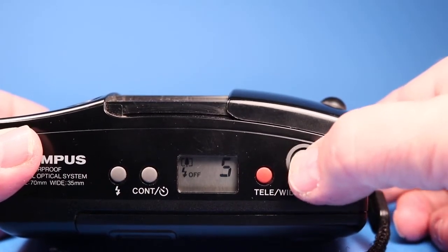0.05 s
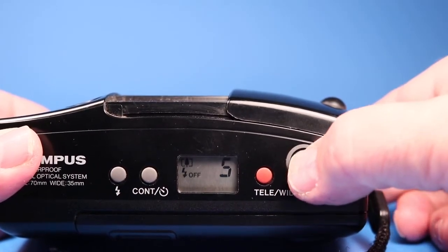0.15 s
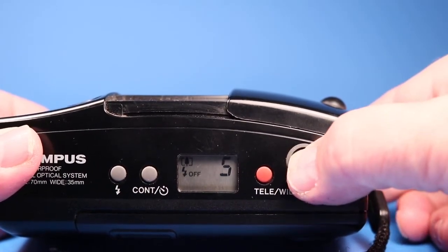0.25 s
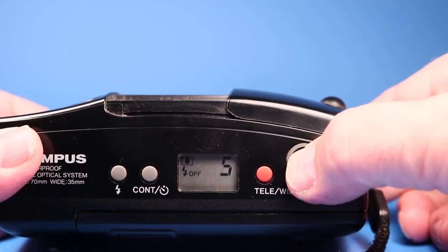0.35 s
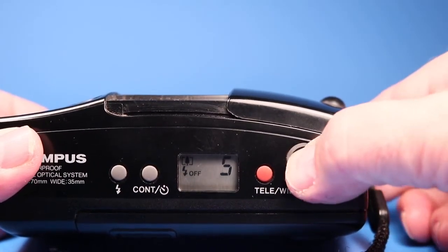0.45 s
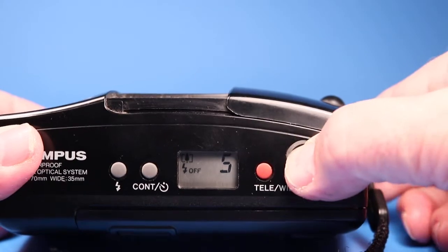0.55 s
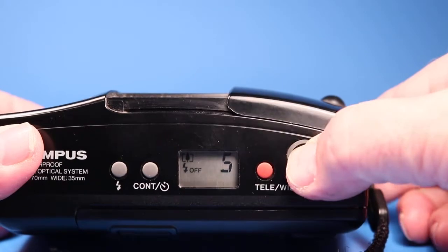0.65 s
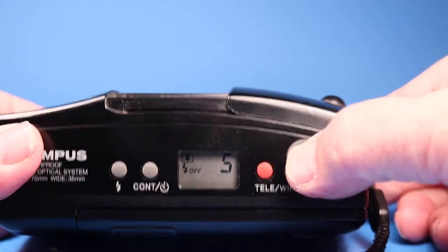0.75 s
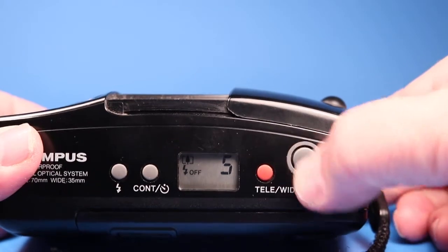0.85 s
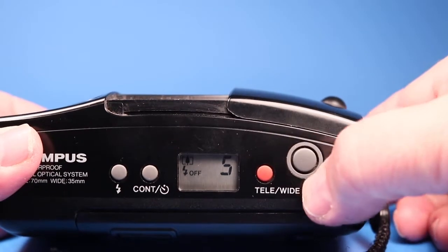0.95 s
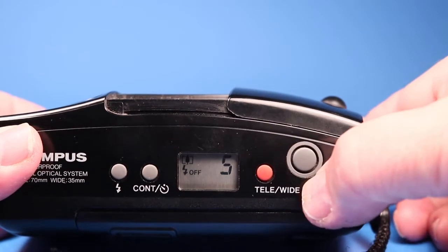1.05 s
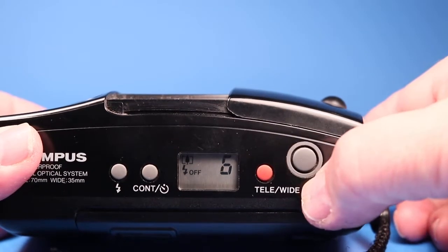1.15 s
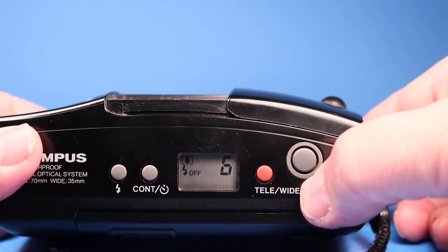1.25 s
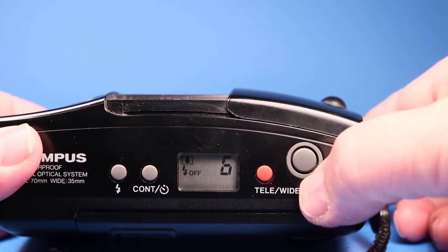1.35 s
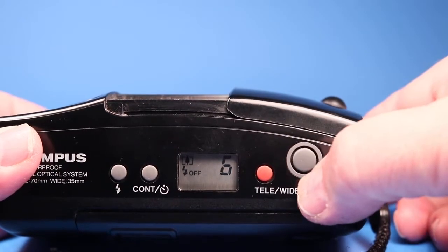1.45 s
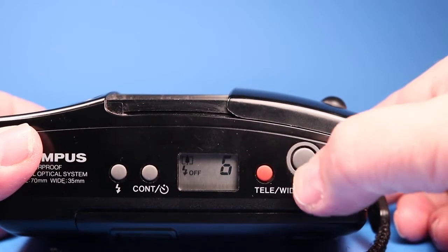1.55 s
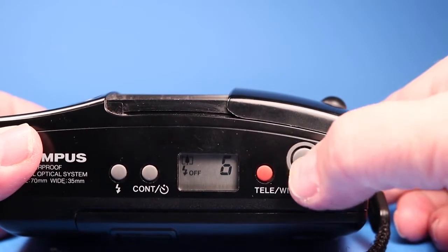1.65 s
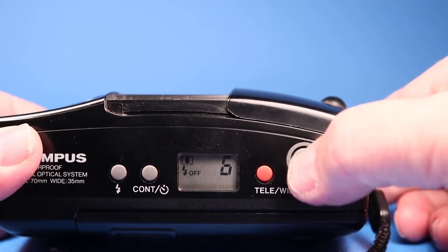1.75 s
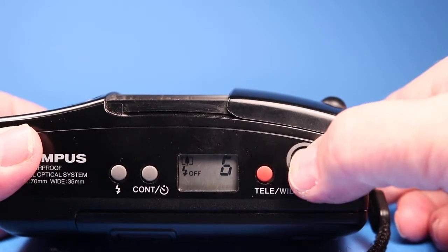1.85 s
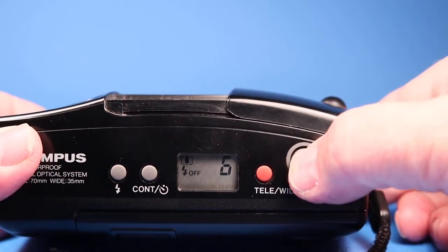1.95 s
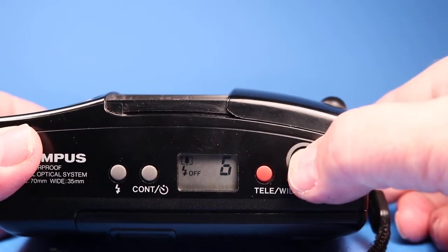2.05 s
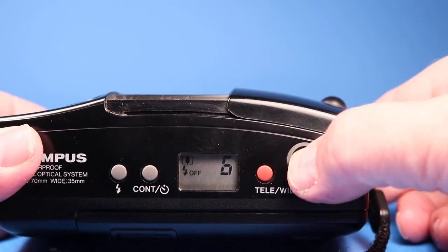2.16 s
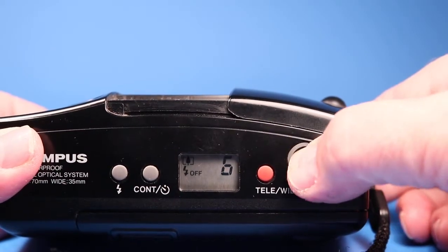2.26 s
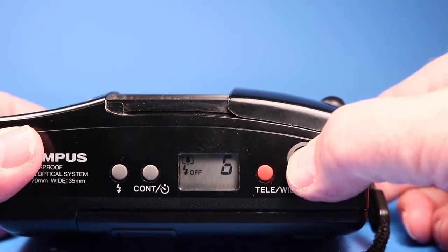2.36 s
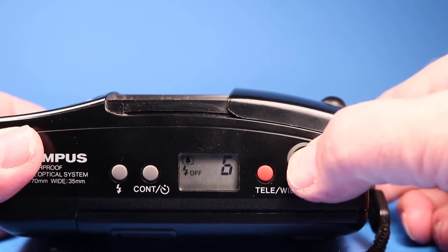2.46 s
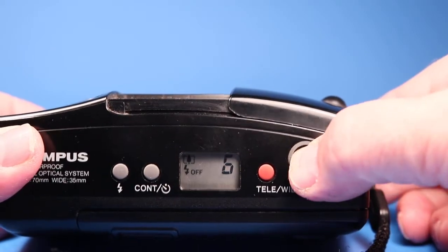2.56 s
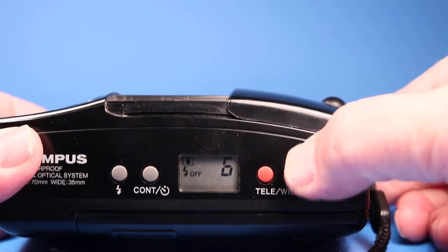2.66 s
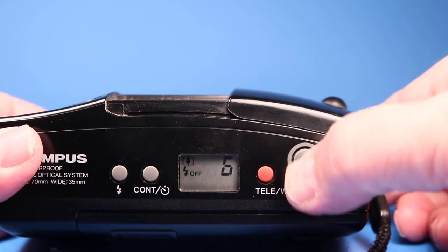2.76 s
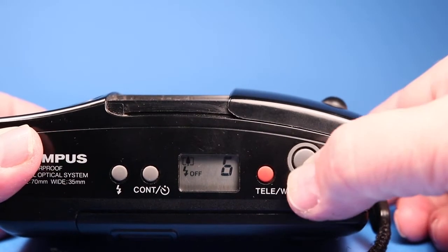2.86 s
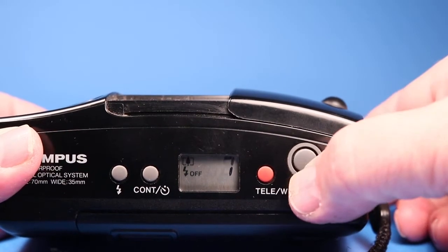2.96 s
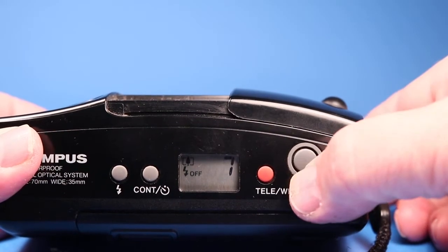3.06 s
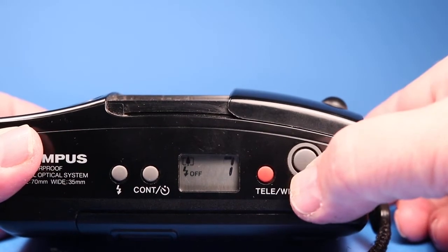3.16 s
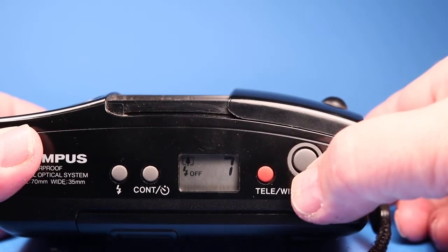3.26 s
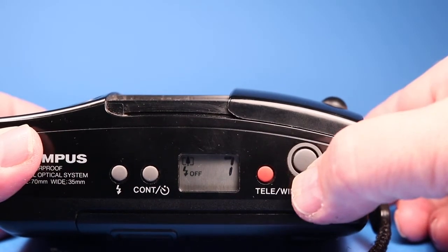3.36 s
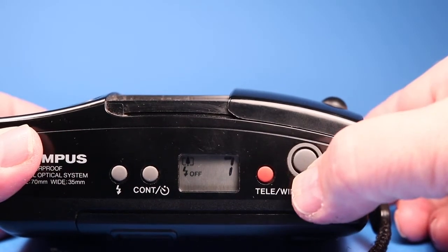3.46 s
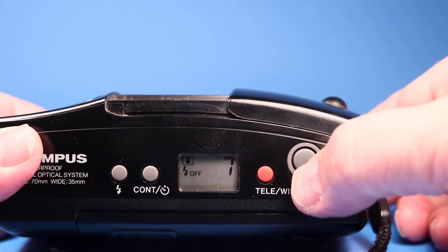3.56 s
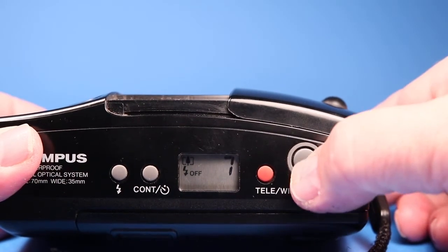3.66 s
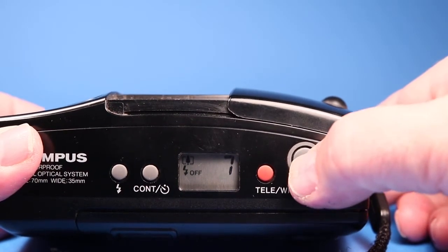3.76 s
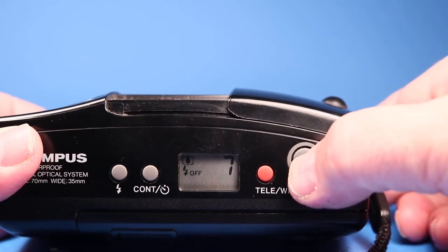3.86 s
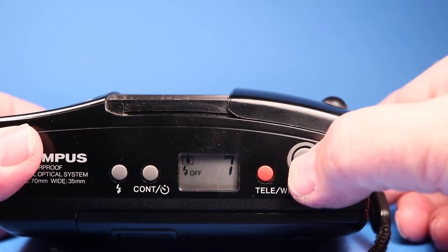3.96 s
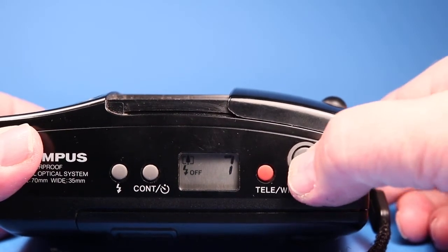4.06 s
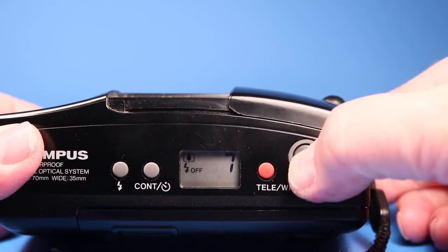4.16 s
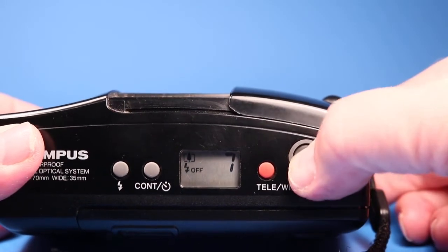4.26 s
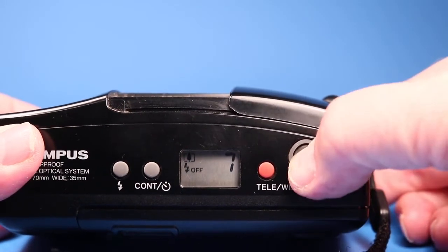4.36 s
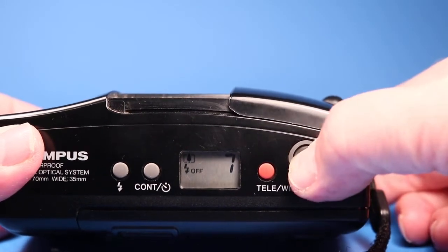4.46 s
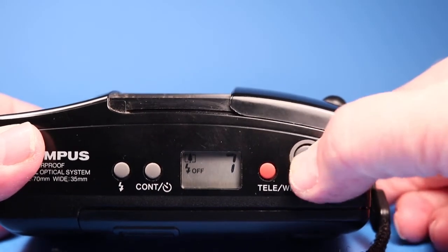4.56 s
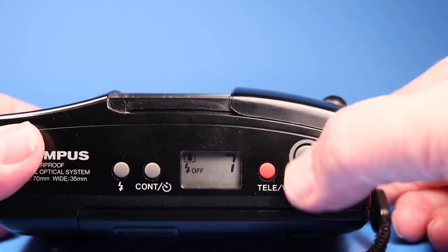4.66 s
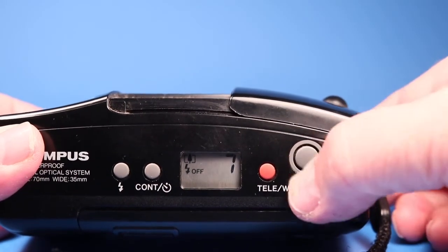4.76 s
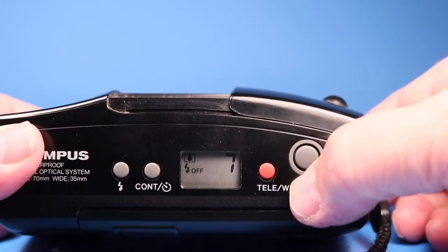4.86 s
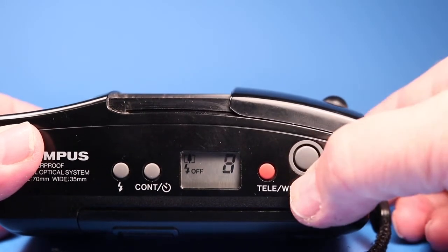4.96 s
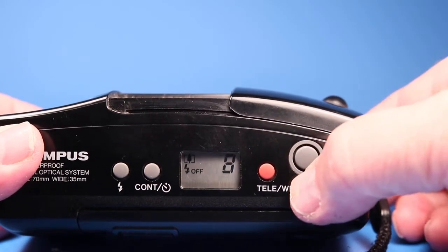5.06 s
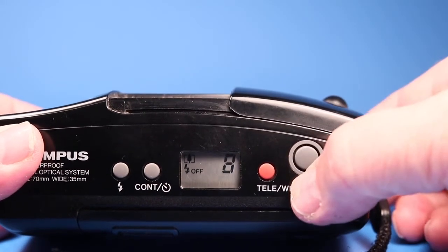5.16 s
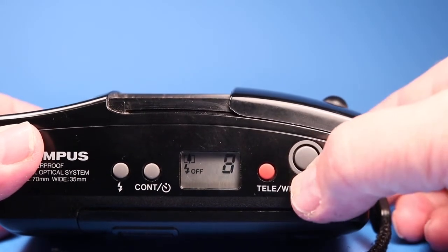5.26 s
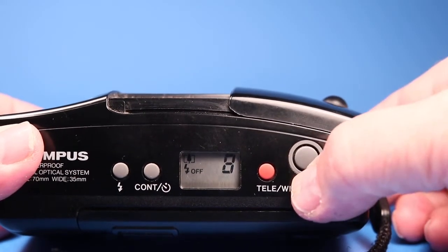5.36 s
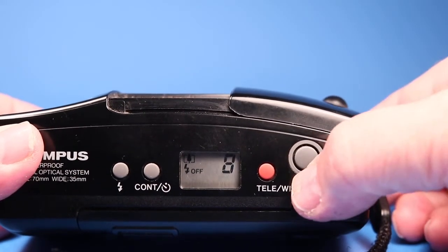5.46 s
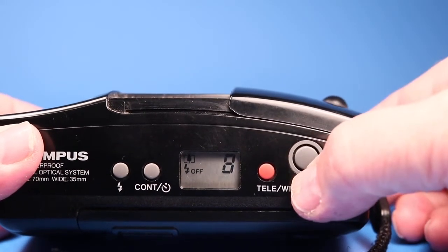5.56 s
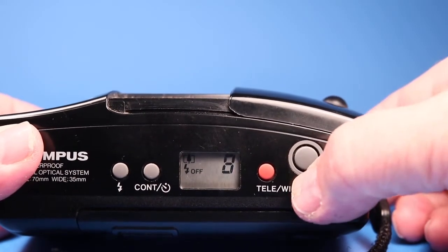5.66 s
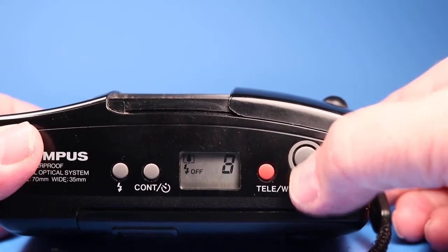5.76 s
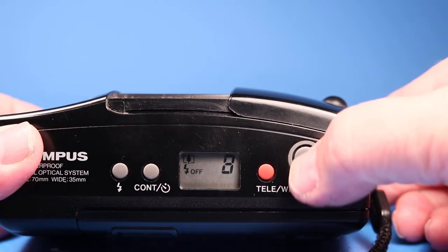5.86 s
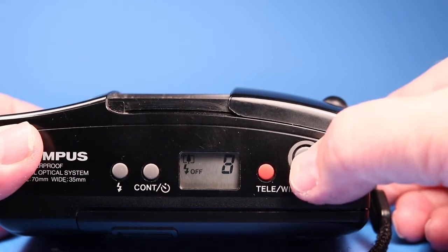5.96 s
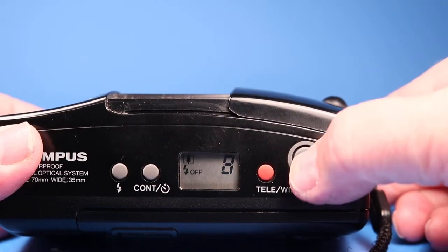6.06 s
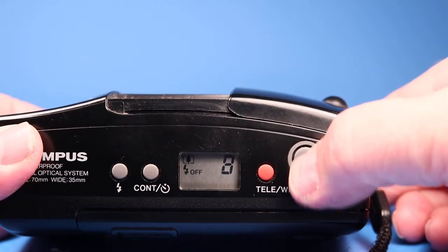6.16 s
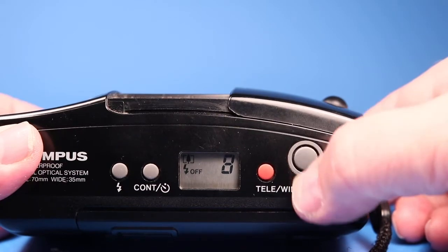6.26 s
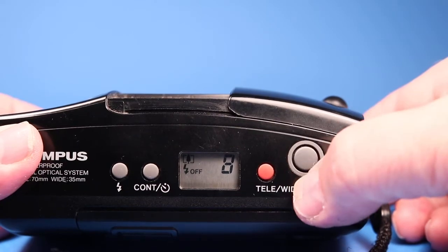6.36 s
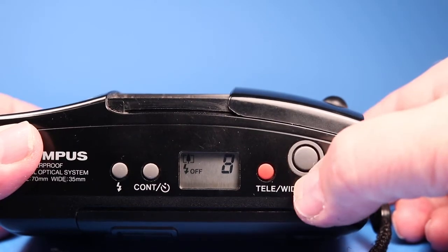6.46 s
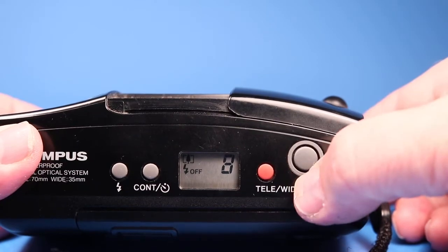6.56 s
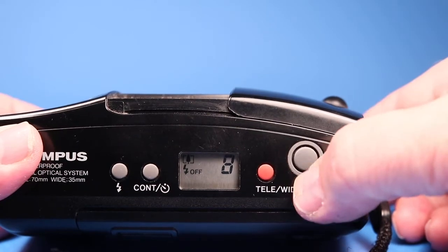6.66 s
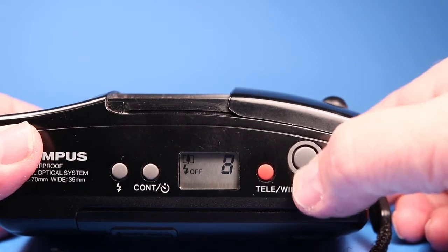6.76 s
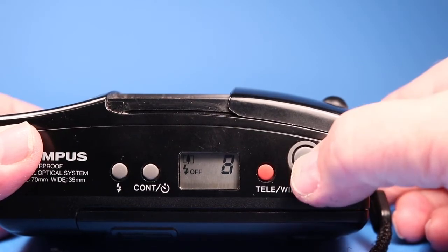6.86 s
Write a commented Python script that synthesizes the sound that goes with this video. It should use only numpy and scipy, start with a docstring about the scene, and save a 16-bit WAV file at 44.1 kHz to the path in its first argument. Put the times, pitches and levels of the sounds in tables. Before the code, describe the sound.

Three times in a quiet room, a small film camera's motor grinds and ticks, the shutter snaps, and the film whirrs forward.

```python
"""A quiet room: a compact film camera, held close, takes three pictures.
Each time the motor labours through a cam cycle with ticking pawls and two juddering climbs; the
mechanism snaps over; the motor runs up, winds the film past a counter click and coasts to rest.
Gear noise, mesh tones and impacts sound through the plastic body. Under them: brush hiss,
a ringing spring, thumb touches, room air and mains hum."""
import sys
import numpy as np
from scipy import signal
from scipy.fft import rfft, irfft, next_fast_len
from scipy.io import wavfile

SR = 44100
rng = np.random.default_rng(int(sys.argv[2]) if len(sys.argv) > 2 else 0)


def put_to_file(sound):
    """Save the sound as 16-bit audio at rate SR, in the file named by the first command-line argument."""
    columns = np.atleast_2d(sound).T  # one column per channel
    safe = np.clip(columns, -1, 1)
    whole_steps = np.round(safe * 32767)
    wavfile.write(sys.argv[1], SR, whole_steps.astype(np.int16))


N = 304157
TIME_S = np.arange(N) / SR
FFT_SIZE = 2 * next_fast_len(N // 2 + SR // 4)
BIN_HZ = np.maximum(np.arange(FFT_SIZE // 2 + 1) * SR / FFT_SIZE, 1)

# cam cycle per picture: start_s, time_stretch, snap_s, snap_db
CAM_CYCLES = [(.5587, 1, 1.159, -9), (2.373, 1, 2.978, -6.5), (4.3597, 1.014, 4.9679, -7)]
# wind per picture: click_s, power_cut_s, full_speed_hz, drag_loss_hz, spring_offset_db
FILM_WINDS = [(1.368, 1.579, 311, -0.5, 1), (3.184, 3.437, 311, 0.5, 3), (5.1707, 5.4288, 311, 93, -15)]
# cam climbs, from motor start, before stretch: begin_s, end_s
CAM_CLIMBS = [(.177, .268), (.502, .66)]
# pawl drops, same clock: start_s, level_db, t60_s
PAWL_DROPS = [(.127, -17, 0.0085), (.157, -18.5, 0.022), (0.2553, -16.5, 0.03), (.285, -14, 0.0077),
              (.358, -12, 0.013), (.4615, -16.5, .012), (0.4902, -20, 0.033), (.565, -14, .012)]
# cam follower knocks, same clock: start_s, level_db
FOLLOWER_KNOCKS = [(.19, -21.5), (.358, -31.5)]
# knocks of the stopping spool: start_s, level_db
SPOOL_STOPS = [(1.642, -29), (3.502, -26.5), (5.444, -32)]
# thumb on button and case: start_s, relative_db, band_hz, t60_s
THUMB_TOUCHES = [(0.299, -46, 9000, 0.01), (0.419, -52, 115, 0.045), (2.141, -49, 9150, .012),
                 (2.213, -51, 106, .06), (4.138, -43.5, 1990, 0.023), (4.153, -34.5, 9300, 0.006),
                 (4.177, -49, 130, 0.041), (6.399, -53, 2500, .02)]

# mesh tones: motor_rate_multiple, relative_db
CAM_TONES = [(1, 0.5), (5, -27), (10, -23.5), (20, -15.5), (23, -25.5), (30, -19), (40, -15.5), (48, -17)]
JUDDER_TONES = [(1, -24), (2, -26), (6, -25.5)]
ROTOR_TONES = [(1, -3.5), (2, -19.5), (3, -20)]
IDLER_TONES = [(4, -34.5), (5, -22.5), (9, -36), (19, -30.5)]
PINION_TONES = [(10, -18), (11, -27), (14, -26), (20, -11.5), (30, -14)]
# body response to rotor unbalance: speed_hz, gain_db
UNBALANCE_RESPONSE = [(120, -1.5), (195, 2.5), (245, -9), (285, -8.5), (315, -5), (332, 2)]

# body colour per force: freq_hz, relative_db
CAM_COLOUR = [(30, -51.5), (140, -33), (300, -24.5), (450, -24.5), (680, -10.5), (900, -13), (1350, -1.5),
              (1900, -1.5), (2800, -2), (3600, -8.5), (5000, -15), (9800, -19), (11000, -28), (16000, -31)]
JUDDER_COLOUR = [(35, -34.5), (110, -7.5), (195, -1), (260, -13.5), (430, -9.5), (680, -0.5), (950, -5.5),
                 (1400, -1), (3000, -30), (10000, -54)]
WIND_COLOUR = [(50, -48), (330, -22), (440, -29), (660, -7.5), (820, -16), (1200, -4), (1600, 2.5),
               (2100, -1), (3000, -3), (3700, -5.5), (5200, -14), (8500, -17.5), (11000, -30.5),
               (16000, -28.5)]
BRUSH_COLOUR = [(2000, -23), (5000, -35.5), (8000, -2.5), (9900, 7), (11200, 2), (16000, -4)]
PAWL_COLOUR = [(100, -46.5), (700, -5.5), (1500, -1), (2900, 6), (4500, -6), (7500, -10), (11000, -14),
               (16000, -24)]
COUNTER_COLOUR = [(100, -38.5), (700, -33), (1500, -12), (2900, 2.5), (4200, -2.5), (5500, -12), (7700, -2),
                  (9500, -10.5), (12000, -15), (16000, -26)]
SNAP_COLOUR = [(30, -51.5), (170, -3), (330, -16), (550, -20.5), (870, 0.5), (1080, -8.5), (1400, 0.5),
               (2000, -8.5), (2800, -1.5), (4300, -11.5), (7500, -15.5), (11000, -24.5), (16000, -28.5)]
KNOCK_COLOUR = [(60, -25.5), (180, -4), (330, -24.5), (640, 4), (1000, -4.5), (1500, 0.5), (3000, -17),
                (10000, -35)]
# case resonances: centre_hz, width_hz, lift_db
CASE_MODES = [(192, 19.4, 6), (704, 72, 2.5), (1410, 130, 1), (1705, 140, 2), (2528, 130, 5.5),
              (2908, 270, 4), (4070, 350, 4), (6215, 620, 6.5), (7750, 290, 3.5), (8620, 360, 4.5),
              (9600, 320, 0)]

# stereo balance: freq_hz, left_minus_right_db
CAMERA_BALANCE = [(100, -0.5), (500, -1.1), (1150, 0), (1750, -2), (2700, -8), (4200, -3.5), (5100, 2.5),
                  (6200, -5), (7300, 0), (15000, 0)]
AIR_BALANCE = [(60, -1.5), (180, -1), (550, -1.5), (1650, -1.5), (4970, -1), (15000, 0)]
# phase between microphones: freq_hz, left_lead_rad
CAMERA_PHASE = [(800, 0), (1650, -.2), (2100, 1.6), (2700, -1.3), (3400, -.3), (4500, -2.1), (5800, -3),
                (7400, -6.1), (12000, -6.3)]
# likeness of left and right: freq_hz, coherence
CAMERA_COHERENCE = [(100, .99), (700, 1), (1200, 0.62), (2200, 0.78), (2600, 0.36), (5500, 0.27),
                    (7000, 0.124), (15000, 0.45)]
AIR_COHERENCE = [(30, .6), (60, 0.51), (120, 0.57), (350, 0.38), (1000, 0.16), (3000, 0.088), (15000, 0.08)]
# room air spectrum: freq_hz, relative_db
AIR_COLOUR = [(12, -56), (20, -20), (48, -9), (120, -5.5), (210, -7), (241, -11.5), (270, -7), (357, -4),
              (422, -11), (607, -10.5), (718, -12), (825, -13.5), (1260, -15), (8890, -25), (16000, -33)]
# mains hum: pitch_hz, level_db
MAINS_HUM = [(59.2, -70), (120, -76), (240, -67), (360, -76)]

# motor speeds in Hz are turns per second
CAM_SPEED_HZ, CLIMB_SPEED_HZ, SPIN_UP_S, INERTIA_S = 128, 99, .019, .025
SPURT_HZ, SPURT_S, SPURT_EASE_DB, SPURT_TONES_EASE_DB = 13, .035, 2.5, 2
CAM_DB, CAM_ATTACK_S, CAM_FADE_DB_PER_S = -23.5, .048, 422
CAM_TONES_DB, PRESS_DB, PRESS_HZ_PER_S = -1.5, 5.5, 450
JUDDER_FREE_DB, JUDDER_FULL_DB, JUDDER_FULL_STRAIN, JUDDER_FADE_DB_PER_S = -54, -30, .62, 261
RUN_UP_S, CREEP_HZ_PER_S, DRAG_EXPONENT, COAST_S, TAIL_S = .048, 37, 1.6, .12, .25
WIND_DB, WIND_DB_PER_OCTAVE, CLICK_EASE_DB, CLICK_EASE_S = -20.5, 13.5, 7.5, .03
RATTLE_DB, RATTLE_S, RATTLE_FADE_DB_PER_S = -21.5, .071, 441
IDLER_LOADED_DB, IDLER_FREE_DB, SLACK_DB, ROTOR_SLACK_DB = 5, 0, -20, -1.5
PINION_DB, PINION_DB_PER_S, PINION_RUN_UP_DB = -1, 14, -13.5
PINION_DB_PER_LOST_HZ, WOBBLE_PER_LOST_HZ = .119, .000109
BRUSH_OFFSET_DB, BRUSH_CEILING_DB, BRUSH_COAST_DB = -18.5, -42.5, 5
COUNTER_DB, BRAKE_DB = -11.5, -14.5
SPRING_HZ, SPRING_T60_S, SPRING_DB = 2630, .94, -54


def cam_drive():
    """The motor labours up to the snap; on each climb the loaded train judders once a turn."""
    whirr, judder, hiss = np.zeros((3, 2, N))
    for start_s, stretch, snap_s, _ in CAM_CYCLES:
        t = np.arange(start_s, snap_s + TAIL_S, 1 / SR)
        speed_hz, strain, spurt = cam_motion((t - start_s) / stretch)
        swell_db = 20 * np.log10(1 - np.exp(-(t - start_s) / CAM_ATTACK_S) + 1e-6)
        gear_db = CAM_DB + swell_db - SPURT_EASE_DB * spurt - CAM_FADE_DB_PER_S * since(t, snap_s)
        strain_db = np.interp(strain, [0, JUDDER_FULL_STRAIN], [JUDDER_FREE_DB, JUDDER_FULL_DB])
        judder_db = strain_db + swell_db - JUDDER_FADE_DB_PER_S * since(t, snap_s)
        braking = -np.tanh(np.gradient(speed_hz, t) / PRESS_HZ_PER_S)
        upper_db = CAM_TONES_DB - SPURT_TONES_EASE_DB * spurt + PRESS_DB * braking
        angle = rotor_angle(t, speed_hz, wobble=.0049)
        teeth = tooth_noise(t, angle, throb_db=2.2, chatter_db=1.8, grain_db=2)
        tones = gear_mesh(t, angle, CAM_TONES[:1], flutter_db=3.5)
        tones += from_db(upper_db) * gear_mesh(t, angle, CAM_TONES[1:], flutter_db=4.5)
        add(whirr, start_s, from_db(gear_db) * (teeth + tones))
        shake = tooth_noise(t, angle, throb_db=8.5, chatter_db=3, grain_db=.5)
        shake += gear_mesh(t, angle, JUDDER_TONES, flutter_db=1)
        add(judder, start_s, from_db(judder_db) * shake)
        add(hiss, start_s, brushes(gear_db))
    return whirr, judder, hiss


def cam_motion(age_s):
    """The motor spins up, slows under strain on each climb and spurts when a pawl lets go."""
    climbing = sum(1. * ((age_s > begin_s) & (age_s < end_s)) for begin_s, end_s in CAM_CLIMBS)
    strain = lagged(climbing, INERTIA_S)
    releases = sum((age_s > at_s) * np.exp(-since(age_s, at_s) / SPURT_S) for at_s, _, _ in PAWL_DROPS)
    spurt = lagged(releases, lag_s=.00793)
    free_hz = CAM_SPEED_HZ * (1 - np.exp(-age_s / SPIN_UP_S)) + SPURT_HZ * spurt
    return free_hz + strain * (CLIMB_SPEED_HZ - free_hz), strain, spurt


def film_wind():
    """The gears sing while pulling one frame through; unpowered, they go slack, rattle and fade."""
    whirr, hiss = np.zeros((2, 2, N))
    for (_, _, snap_s, _), (click_s, cut_s, full_hz, drag_hz, _) in zip(CAM_CYCLES, FILM_WINDS):
        t = np.arange(snap_s, cut_s + TAIL_S, 1 / SR)
        age_s = t - snap_s
        speed_hz, lost_hz = wind_motion(t, click_s, cut_s, full_hz, drag_hz)
        slack = lagged(1. * (t > cut_s), lag_s=.021)
        slack_db = SLACK_DB * slack
        ease_db = CLICK_EASE_DB * (t > click_s) * np.exp(-since(t, click_s) / CLICK_EASE_S)
        pull_db = WIND_DB + WIND_DB_PER_OCTAVE * np.log2(speed_hz / full_hz) - ease_db
        fade_s = cut_s + RATTLE_S * np.interp(cut_s, t, speed_hz) / full_hz
        gear_db = pull_db + slack * (RATTLE_DB - pull_db) - RATTLE_FADE_DB_PER_S * since(t, fade_s)
        rotor_db = np.interp(speed_hz, *np.transpose(UNBALANCE_RESPONSE)) + ROTOR_SLACK_DB * slack
        # the idler drives the counter until it clicks
        idler_db = np.where(t < click_s, IDLER_LOADED_DB, IDLER_FREE_DB) + slack_db
        # the pinion whines louder as the film tightens
        run_up_db = PINION_RUN_UP_DB * np.exp(-age_s / RUN_UP_S)
        pinion_db = PINION_DB + PINION_DB_PER_S * age_s + run_up_db + slack_db
        angle = rotor_angle(t, speed_hz, wobble=.0032 + WOBBLE_PER_LOST_HZ * lost_hz)
        force = tooth_noise(t, angle, throb_db=1, chatter_db=3.5, grain_db=2.5)
        voices = [(ROTOR_TONES[:1], rotor_db), (ROTOR_TONES[1:], slack_db),
                  (IDLER_TONES, idler_db),
                  (PINION_TONES[:1], pinion_db + PINION_DB_PER_LOST_HZ * lost_hz),
                  (PINION_TONES[1:], pinion_db)]
        for tones, gain_db in voices:
            force += from_db(gain_db) * gear_mesh(t, angle, tones, flutter_db=2)
        add(whirr, snap_s, from_db(gear_db) * force)
        add(hiss, snap_s, from_db(BRUSH_COAST_DB * slack) * brushes(gear_db))
    return whirr, hiss


def wind_motion(t, click_s, cut_s, full_hz, drag_hz):
    """Quick run-up, any film drag after the counter click, then coasting."""
    powered_s = np.minimum(t, cut_s)
    age_s = powered_s - t[0]
    lost_hz = drag_hz * (since(powered_s, click_s) / (cut_s - click_s)) ** DRAG_EXPONENT
    run_up_hz = full_hz - (full_hz - CLIMB_SPEED_HZ) * np.exp(-age_s / RUN_UP_S)
    driven_hz = run_up_hz + CREEP_HZ_PER_S * age_s - lost_hz
    return driven_hz * np.exp(-since(t, cut_s) / COAST_S), lost_hz


def rotor_angle(t, speed_hz, wobble):
    """Angle in radians of a slightly unsteady motor."""
    return 2 * np.pi * np.cumsum(speed_hz * (1 + wobble * drift(149.2, t))) / SR


def tooth_noise(t, angle, throb_db, chatter_db, grain_db):
    """Dense tooth contacts of uneven force, harder once a turn, chattering in their play."""
    noise = rng.standard_normal((3, 2 * SR))[:, :len(t)]
    force_db = grain_db * noise[2] + throb_db * np.cos(angle) + chatter_db * np.tanh(drift(330, t))
    return rms_one(noise[:2] * from_db(force_db))


def gear_mesh(t, angle, tones, flutter_db):
    """Gear pairs sing multiples of the motor rate; off-centre teeth press harder once a turn."""
    quadrature = np.array([[0], [np.pi / 2]])
    out = 0
    for multiple, level_db in tones:
        roughness = min(multiple / 10, 1)  # fine teeth rattle in their play
        phase = np.round(multiple) * angle + rng.uniform(0, 2 * np.pi)
        phase += roughness * .5 * drift(180, t)
        tone_db = level_db + flutter_db * drift(70.74, t)
        throb_db = roughness * 3.55 * np.cos(angle + rng.uniform(0, 2 * np.pi))
        spread_rad = quadrature + [[0], [1]] * drift(12.03, t)
        out += np.sqrt(2) * from_db(tone_db + throb_db) * np.sin(phase + spread_rad)
    return out


def brushes(gear_db):
    """Brush hiss follows the gear level up to a ceiling."""
    level_db = np.minimum(gear_db + BRUSH_OFFSET_DB, BRUSH_CEILING_DB)
    return from_db(level_db) * rng.standard_normal((2, len(gear_db)))


def mechanism_impacts():
    """Forces of pawls and brake, frame counter, snaps, and follower and spool knocks."""
    pawls, counter, snaps, knocks = np.zeros((4, 2, N))
    thuds = list(SPOOL_STOPS)
    for start_s, stretch, snap_s, snap_db in CAM_CYCLES:
        for at_s, level_db, t60_s in PAWL_DROPS:
            add(pawls, start_s + stretch * at_s, from_db(level_db) * impact(t60_s, hold_s=.0025, crack=6))
        add(snaps, snap_s, from_db(snap_db) * impact(t60_s=.018, hold_s=.0029, crack=9.7))
        thuds += [(start_s + stretch * at_s, level_db) for at_s, level_db in FOLLOWER_KNOCKS]
    for click_s, cut_s, *_ in FILM_WINDS:
        add(counter, click_s, from_db(COUNTER_DB) * impact(t60_s=.008, hold_s=.0015, crack=7.5))
        add(pawls, cut_s, from_db(BRAKE_DB) * impact(t60_s=.028, hold_s=.002, crack=6.5))
    for start_s, level_db in thuds:
        add(knocks, start_s, from_db(level_db) * impact(t60_s=.0516, hold_s=.0059, crack=9.9))
    return pawls, counter, snaps, knocks


def impact(t60_s, hold_s, crack):
    """Hard contact, a brief buzz as the parts bounce, fast decay."""
    t = TIME_S[:SR // 8]
    burst = rng.choice([-1., 1.], (2, len(t))) * from_db(-60 * since(t, hold_s) / t60_s)
    burst[0, 0] = crack
    return burst


def camera_body(parts):
    """Body colours and case resonances shape each force on its way to two close microphones."""
    lift_db = sum(db / (1 + (2 * (BIN_HZ - hz) / width_hz) ** 2) for hz, width_hz, db in CASE_MODES)
    spectra = 0
    for force, colour in parts:
        response = minimum_phase(rms_one(from_db(over_hz(colour) + lift_db)))
        spectra += rfft(force, FFT_SIZE) * response
    sides = np.array([[.5], [-.5]])
    balance = from_db(sides * over_hz(CAMERA_BALANCE))
    balance /= np.sqrt(np.mean(balance ** 2, axis=0))
    phase_shift = np.exp(1j * sides * over_hz(CAMERA_PHASE))
    return irfft(stereo_pair(spectra, CAMERA_COHERENCE) * balance * phase_shift)[:, :N]


def spring():
    """A small spring, flicked as each wind ends, rings on faintly."""
    out, t = np.zeros((2, N)), TIME_S[:SR]
    tone = np.sin(2 * np.pi * SPRING_HZ * t)[None]
    for _, cut_s, _, _, offset_db in FILM_WINDS:
        add(out, cut_s, from_db(SPRING_DB + offset_db - 60 * t / SPRING_T60_S) * tone)
    return out


def thumb(gain_db=6):
    """Faint button ticks and soft bumps on the case."""
    out = np.zeros((2, N))
    for start_s, relative_db, band_hz, t60_s in THUMB_TOUCHES:
        edges_hz = [band_hz / 1.58, min(band_hz * 1.34, SR * .45)]
        band = signal.butter(2, edges_hz, "band", fs=SR, output="sos")
        touch = signal.sosfilt(band, impact(t60_s, hold_s=.00023, crack=3.4)[:1])
        add(out, start_s, from_db(relative_db + gain_db) * touch / np.abs(touch).max())
    return out


def room(sound, t60_s=.21, level_db=-12):
    """Short tail from the walls; long waves reach both microphones alike."""
    t = TIME_S[:SR // 2]
    tail = rng.standard_normal((2, len(t))) * from_db(-60 * t / t60_s) * (t > .004)
    bass = signal.sosfilt(signal.butter(1, 900, fs=SR, output="sos"), tail)
    tail = tail - bass + bass[0]
    tail /= np.sqrt(np.sum(tail[0] ** 2))
    return from_db(level_db) * signal.fftconvolve(sound, tail, axes=1)[:, :N]


def background(air_db=-54):
    """Still air, microphone hiss and faint mains hum."""
    gains = from_db(over_hz(AIR_COLOUR) + np.array([[.5], [-.5]]) * over_hz(AIR_BALANCE))
    noise = rfft(rng.standard_normal((2, FFT_SIZE)))
    air = irfft(stereo_pair(noise, AIR_COHERENCE) * gains)[:, :N]
    hum = sum(np.sqrt(2) * from_db(level_db) * np.sin(2 * np.pi * (pitch_hz * TIME_S + rng.random()))
              for pitch_hz, level_db in MAINS_HUM)
    return from_db(air_db) * rms_one(air) + hum


def from_db(db):
    return 10 ** (np.asarray(db) / 20)


def rms_one(x):
    return x / np.sqrt(np.mean(x ** 2) + 1e-20)


def since(t, start_s):
    return np.maximum(t - start_s, 0)


def add(track, start_s, sound):
    start = int(start_s * SR)
    track[:, start:start + sound.shape[1]] += sound[:, :N - start]


def lagged(target, lag_s):
    """One-pole inertia."""
    pole = np.exp(-1 / (lag_s * SR))
    return signal.lfilter([1 - pole], [1, -pole], target)


def drift(rate_hz, t):
    """Random wander, spread about 1."""
    knots = rng.standard_normal(4096)
    return np.interp((t - t[0]) * rate_hz, np.arange(len(knots)), knots)


def over_hz(points):
    """Table interpolated over log frequency."""
    freq_hz, value = np.transpose(points)
    return np.interp(np.log(BIN_HZ), np.log(freq_hz), value)


def minimum_phase(gain):
    """Causal response: nothing rings before it is struck."""
    cepstrum = irfft(np.log(gain))
    cepstrum[1:FFT_SIZE // 2] *= 2
    cepstrum[FFT_SIZE // 2 + 1:] = 0
    return np.exp(rfft(cepstrum))


def stereo_pair(spectra, coherence):
    """Two unrelated spectra mixed to left and right of the given coherence."""
    alike = np.clip(over_hz(coherence), -.995, .995)
    mid = np.sqrt((1 + alike) / 2) * spectra[0]
    side = np.sqrt((1 - alike) / 2) * spectra[1]
    return np.array([mid + side, mid - side])


def scene():
    """Drive and impacts through one body, plus spring, thumb, room and background."""
    cam, judder, cam_hiss = cam_drive()
    wind, wind_hiss = film_wind()
    pawls, counter, snaps, knocks = mechanism_impacts()
    camera = camera_body([(cam, CAM_COLOUR), (judder, JUDDER_COLOUR), (wind, WIND_COLOUR),
                          (cam_hiss + wind_hiss, BRUSH_COLOUR), (pawls, PAWL_COLOUR),
                          (counter, COUNTER_COLOUR), (snaps, SNAP_COLOUR), (knocks, KNOCK_COLOUR)])
    close = camera + spring() + thumb()
    return close + room(close) + background()


def record(dry):
    """Clip at full scale, low-pass at 16 kHz."""
    lowpass = signal.ellip(10, .1, 70, 16000, fs=SR, output="sos")
    return signal.sosfilt(lowpass, np.clip(dry, -1, 1))


dry = scene()
out = record(dry)
put_to_file(out)
```